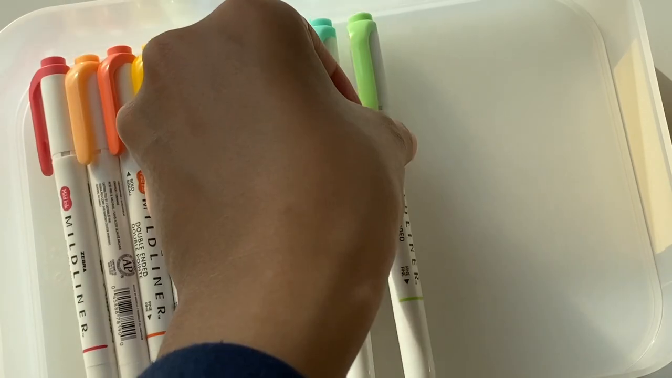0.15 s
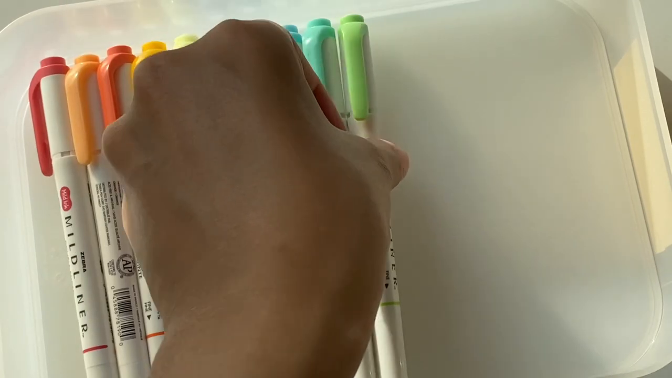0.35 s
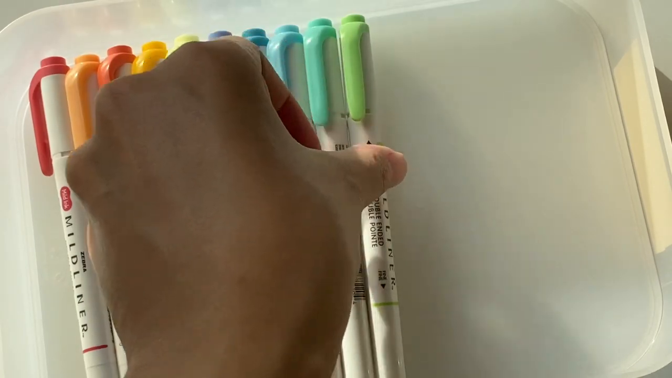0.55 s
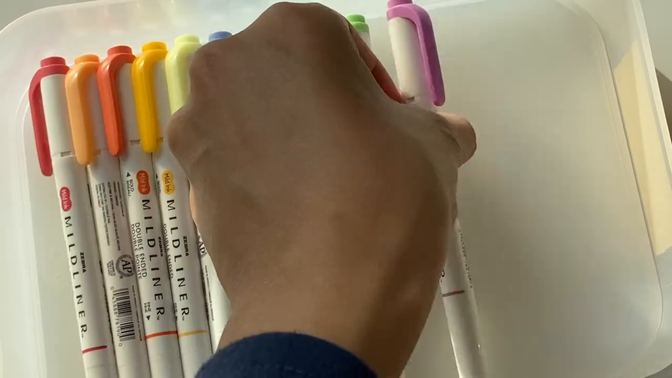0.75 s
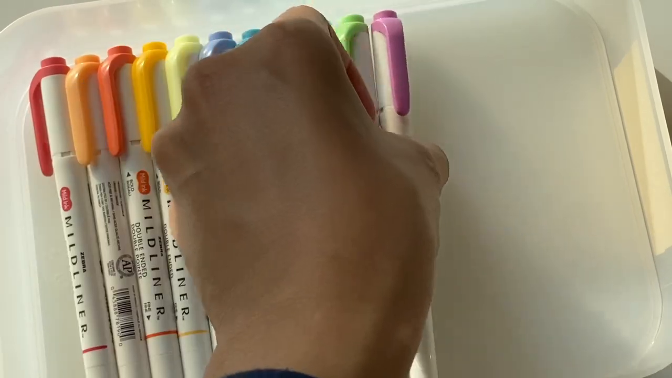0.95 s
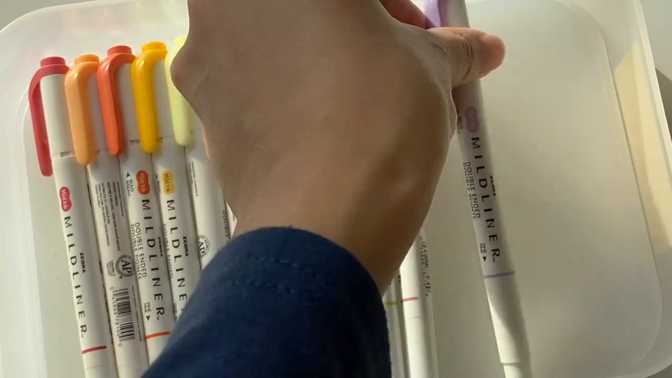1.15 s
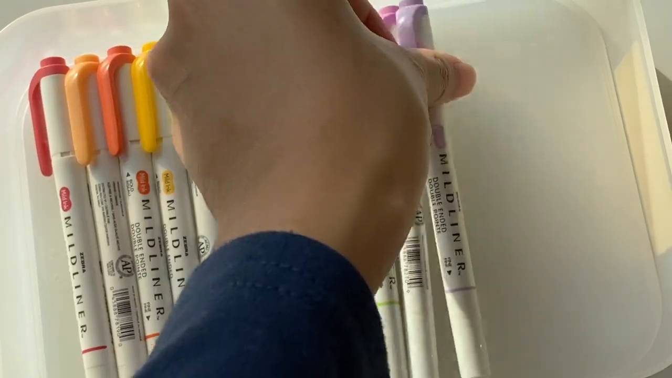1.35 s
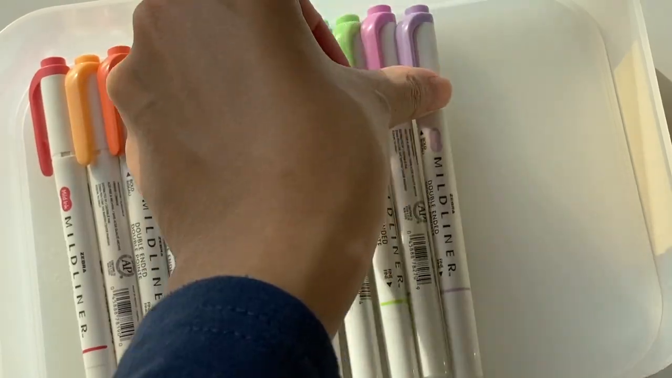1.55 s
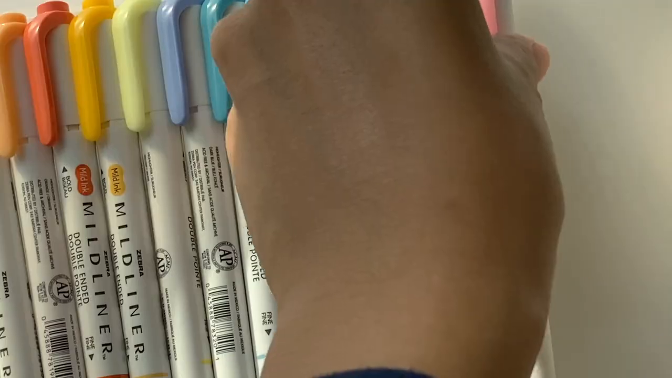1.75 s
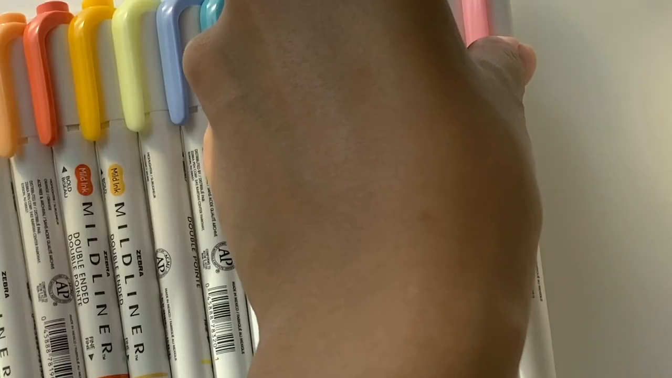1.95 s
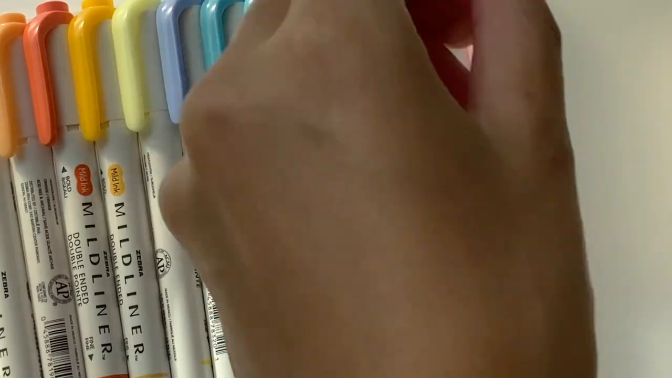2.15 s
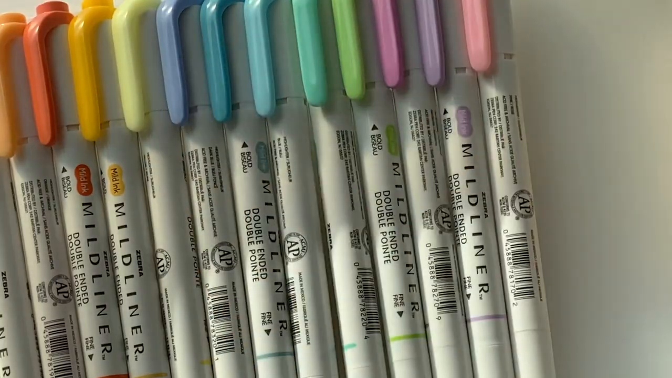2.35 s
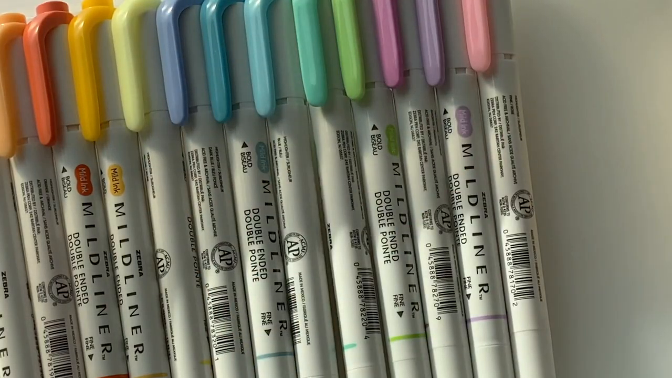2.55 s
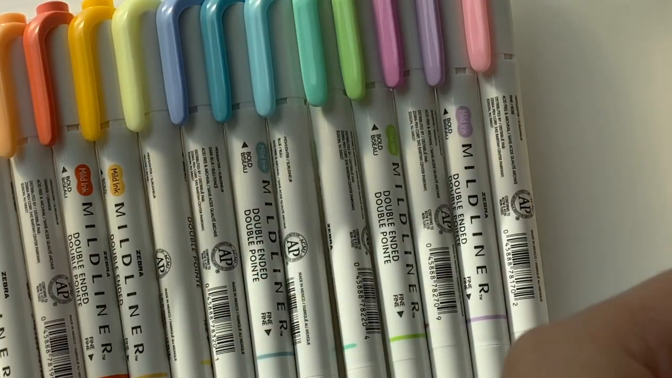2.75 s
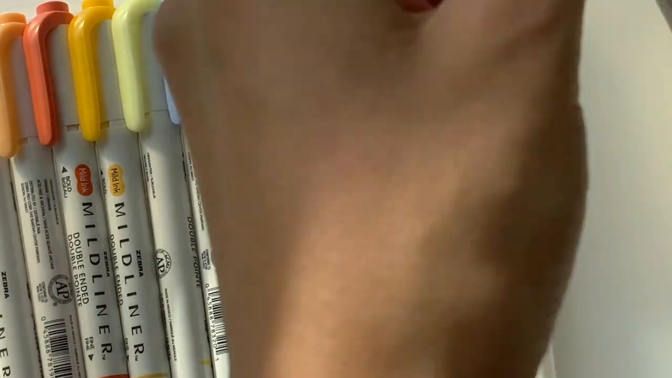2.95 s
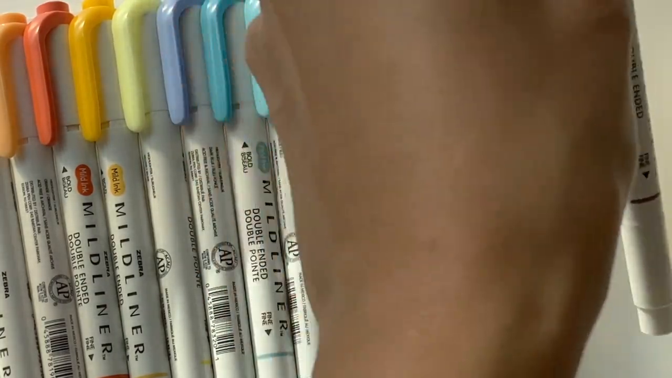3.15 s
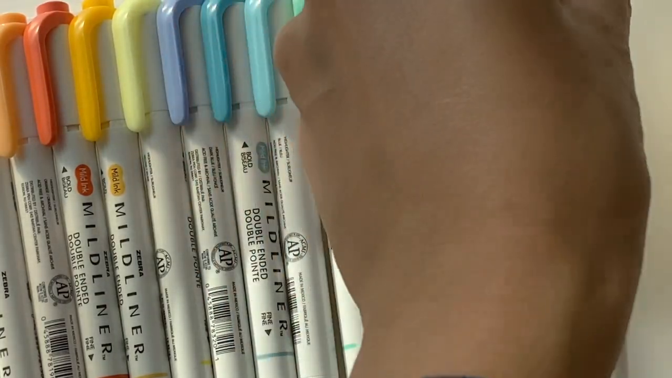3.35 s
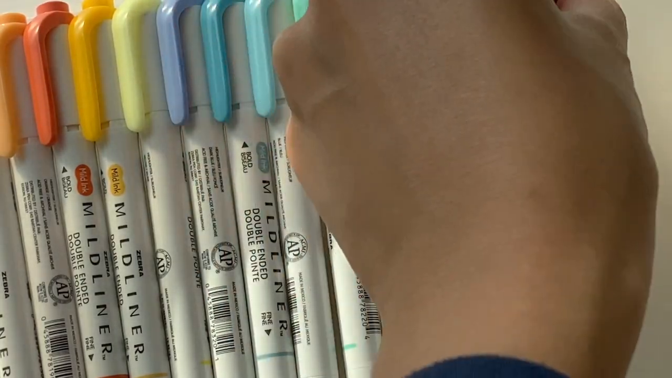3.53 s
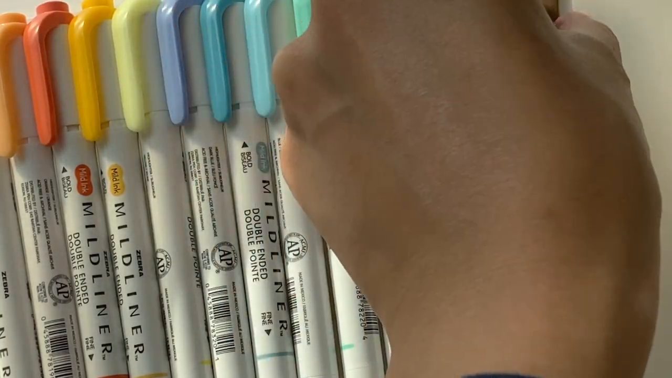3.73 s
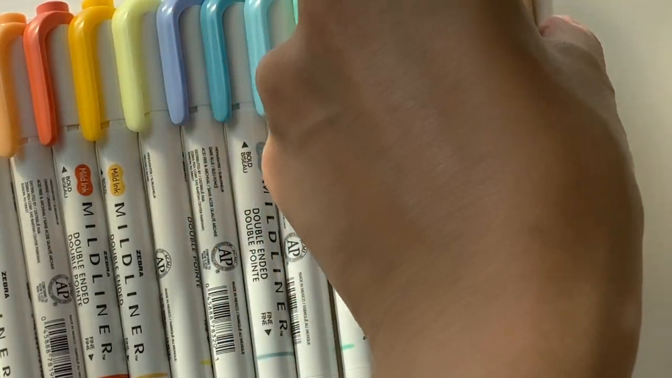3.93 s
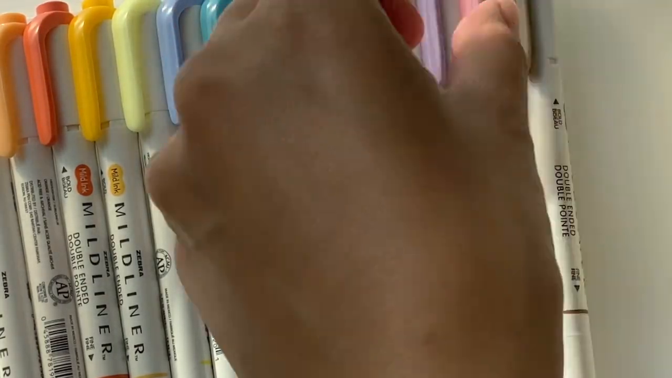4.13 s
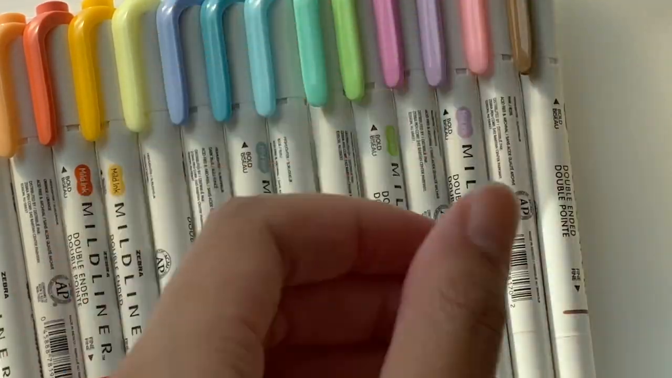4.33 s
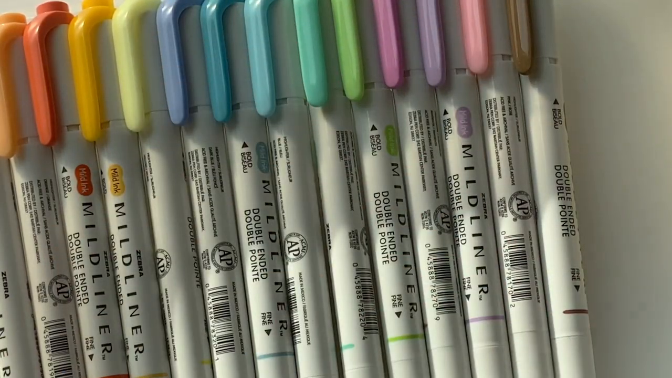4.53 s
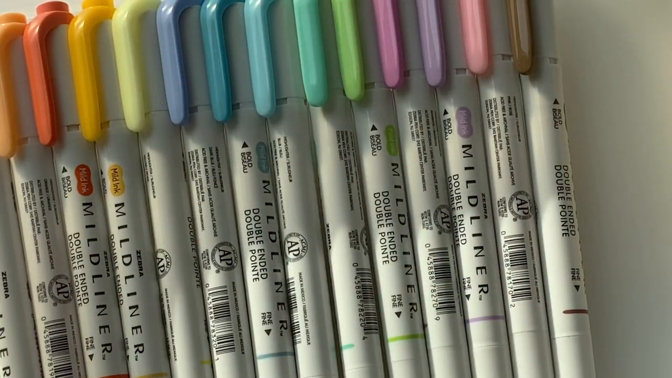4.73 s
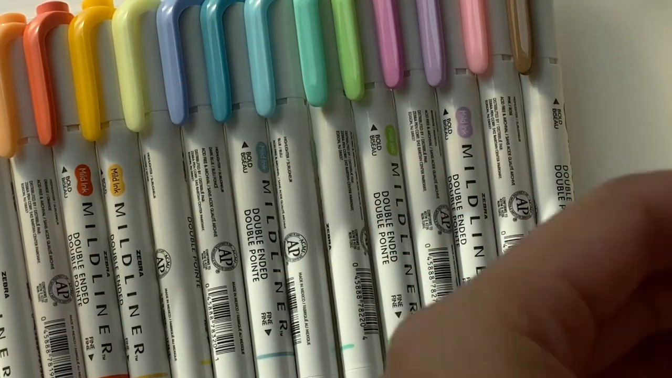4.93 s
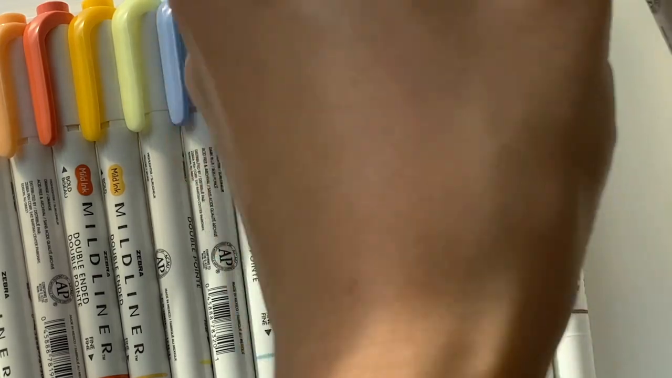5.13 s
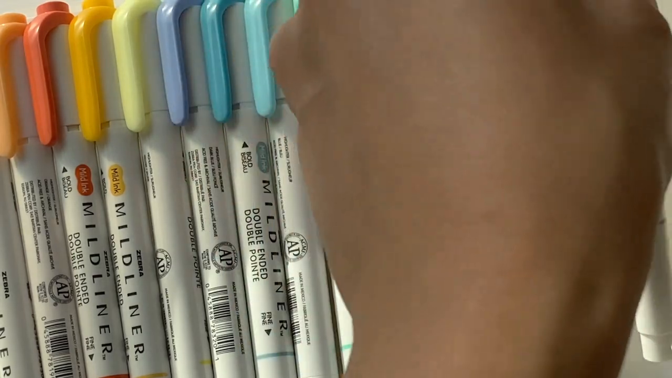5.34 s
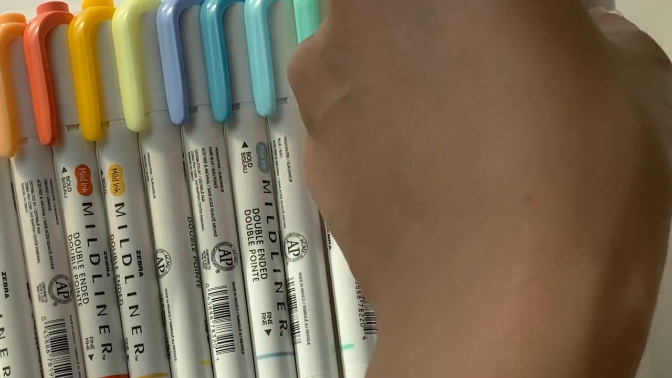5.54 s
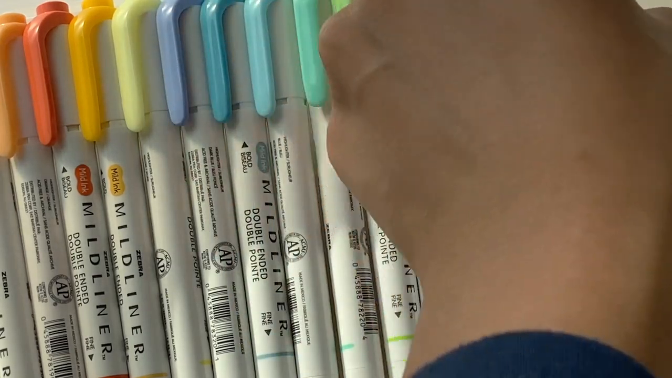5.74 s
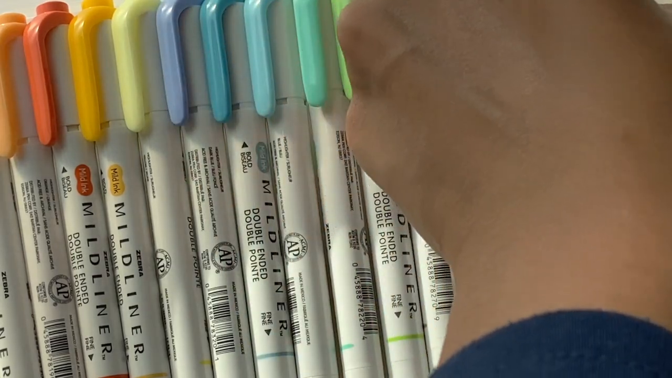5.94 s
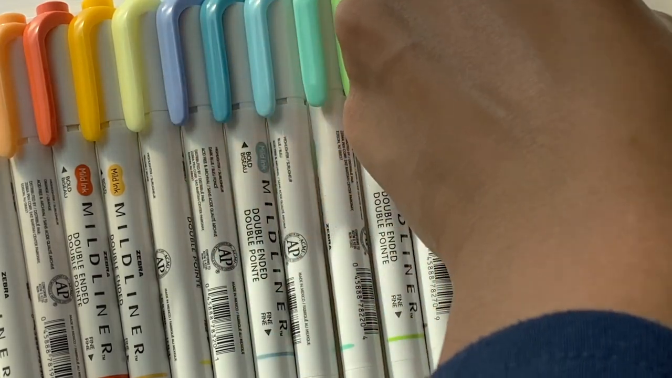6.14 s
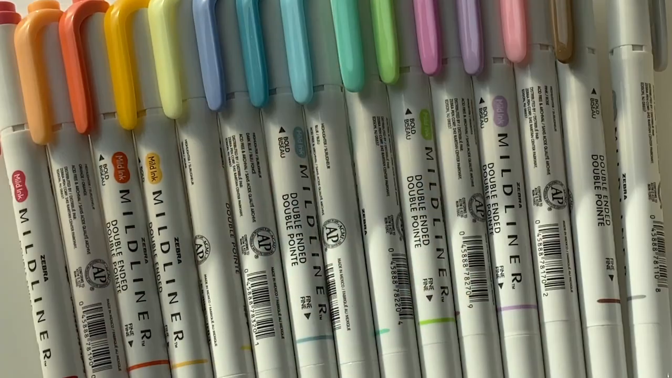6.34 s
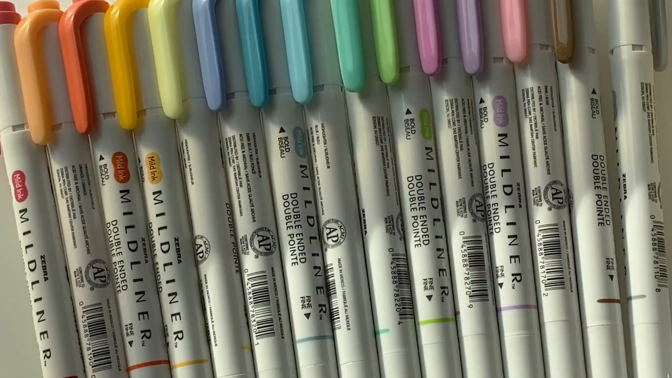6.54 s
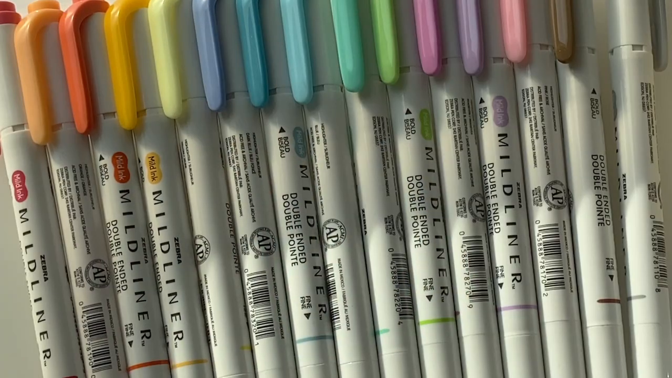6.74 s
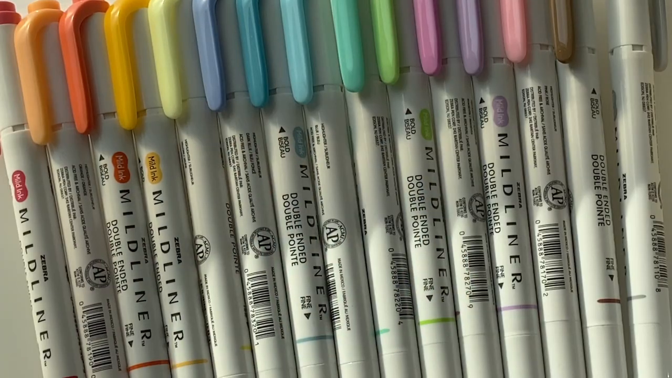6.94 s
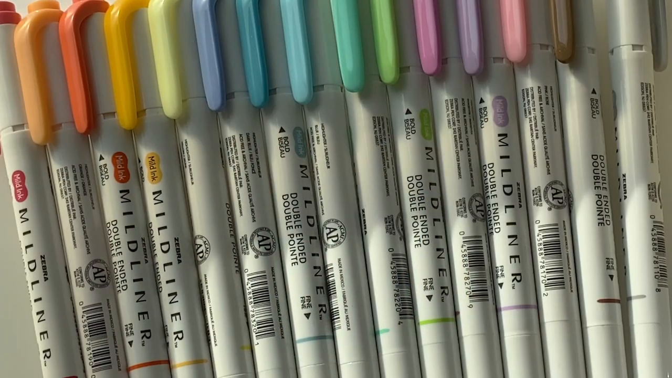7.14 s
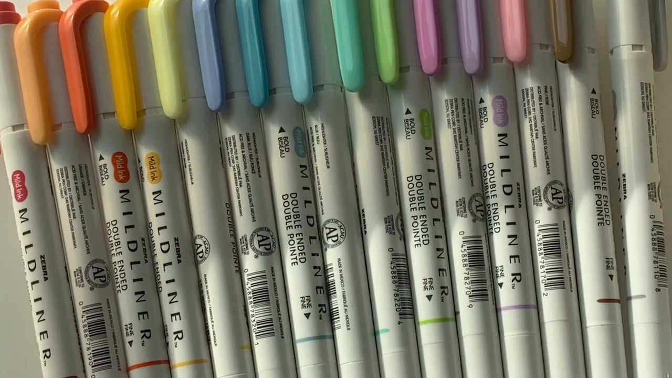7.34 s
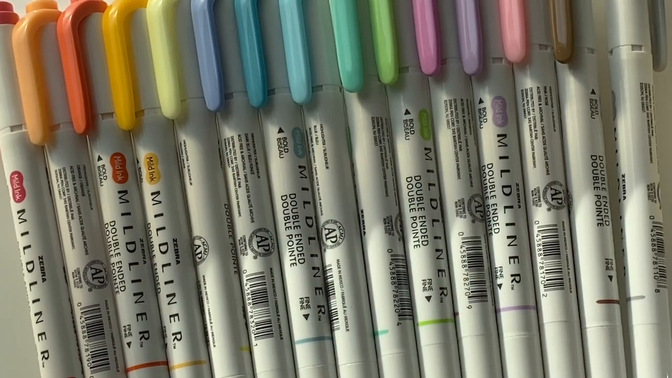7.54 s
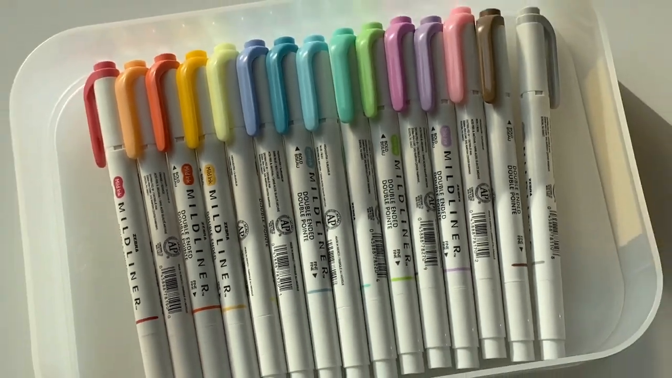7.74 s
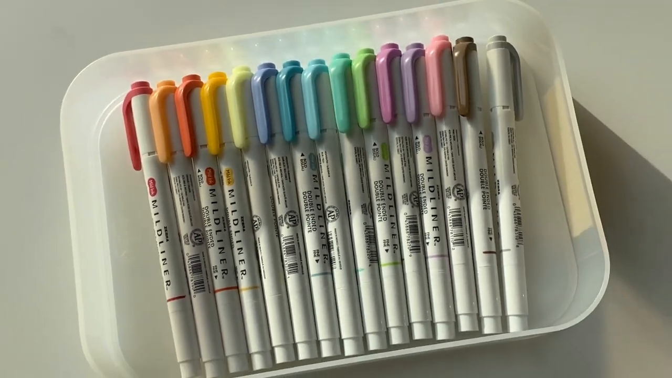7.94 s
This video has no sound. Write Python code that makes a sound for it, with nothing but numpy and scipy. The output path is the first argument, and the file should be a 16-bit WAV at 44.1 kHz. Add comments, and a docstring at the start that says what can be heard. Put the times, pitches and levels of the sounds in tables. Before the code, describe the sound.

Hollow plastic pens are laid one by one in a plastic tray, sharp clacks first, then sparse soft taps, in a small room.

```python
"""A faint scrape over a low room rumble, then the clack of a plastic pen landing in a thin plastic tray.
More pens are laid beside it, close to a two-port microphone in a small room; they slide and nudge neighbours.
Each blow is a click that rings the modes of the hollow pens and the tray floor, followed by nearby scatter
and room echoes. Slides are runs of tiny contacts through the same tray. A sleeve swishes now and then as
swells of bright noise, and shaped noise with a swelling low end makes the rumble."""
import sys
import numpy as np
from scipy import signal
from scipy.fft import rfft, irfft
from scipy.io import wavfile

SR = 44100
rng = np.random.default_rng(int(sys.argv[2]) if len(sys.argv) > 2 else 0)


def digitize_waveform(pressure):
    """Quantize a signal to 16-bit integers and store it at the path in sys.argv[1].

    Rows of a 2-D input are taken as channels; values are limited to [-1, 1].
    """
    field = np.atleast_2d(pressure).T
    bounded = np.clip(field, -1, 1)
    quanta = np.round(bounded * 32767).astype(np.int16)
    wavfile.write(sys.argv[1], SR, quanta)


N = 351918  # samples in the scene

# A pen is let go and lands, one end after the other; levels are relative:
# start_s, level_db, pitch_hz (strongest ring), tray_floor_db, hardness_db, other_end_wait_s
LANDINGS = [(0.1662, 1.5, 2350, -0.5, -1.5, .0038), (0.8021, 1, 1999, -0.5, 3.5, 0.0044),
            (1.445, -4.5, 2200, 1, 4.5, .0105), (1.6479, -14.5, 2290, 1.5, 1.5, 0.014),
            (3.4039, -15.5, 2984, 3.5, 9, .0274), (5.4181, -19.5, 1520, -1, 1, 0.012)]
# Single contacts with a neighbour or the tray: start_s, level_db (relative), pitch_hz, tray_floor_db, hardness_db
TAPS = [(0.196, -9.5, 2630, 2.5, 4.5), (0.2787, -30, 4700, 0, 15.5), (0.339, -34.5, 1900, 0.5, 8),
        (0.3765, -28.5, 2280, -2, 2), (0.9678, -21.5, 2000, -17, 8.5), (1.229, -30, 2280, 8.5, -12),
        (1.2905, -39, 1850, 4.5, -21), (1.3092, -31.5, 1880, 1, -6), (1.3512, -30.5, 5200, 8, 10.5),
        (1.3698, -13, 2180, -5.5, -4), (1.4105, -25, 2130, 4.5, 5), (1.432, -16, 6904, -1, 5.5),
        (1.4783, -11.5, 1670, -5.5, 3), (1.7452, -39, 6700, -2.5, 6.5), (2.3763, -47, 3353, -34, 12),
        (3.371, -27.5, 2100, 4, 3.5), (3.384, -32.5, 1420, 4.5, 1), (3.572, -41, 1773, -2, -19),
        (3.7082, -30.5, 740, 6.5, -18.5), (3.762, -41, 1464, 4, -13), (3.846, -40.5, 2340, 7, -2),
        (3.971, -35, 760, 5, -19), (5.561, -38, 1193, 0, 0.5), (5.7577, -43, 2045, -14, -21),
        (5.803, -59, 1240, -3, -17), (6.0833, -41.5, 1500, 2.5, -7), (6.1077, -32.5, 629, 10, -15),
        (6.188, -38, 2300, -0.5, -3), (6.2022, -9, 2300, -3, -4.5), (7.5017, -50, 753.3, 8.5, -8.5),
        (7.61, -60, 2112, 1, -0.5)]
# Pens sliding or rocking to rest on the tray or each other:
# start_s, end_s, grain_level_db (relative), pitch_hz, hardness_db
SLIDES = [(.072, .163, -61.5, 1380, -15), (.35, .385, -54.5, 2180, 6.5), (.777, .801, -54.5, 1810, -7),
          (1.2215, 1.25, -48, 2000, 1), (1.27, 1.34, -56.5, 2000, -2), (1.342, 1.44, -51.5, 1900, -8),
          (2.37, 2.42, -79, 3500, 13), (3.5, 3.64, -66, 1300, -5), (3.76, 3.87, -70, 1000, -13.5),
          (5.47, 5.61, -67, 2900, 2)]
# Spectrum of a typical blow: freq_hz, level_db (relative)
BLOW_SPECTRUM = [(40, 7), (115, 24), (190, 23.5), (290, 29.5), (600, 29), (1000, 25.5), (2000, 19),
                 (3200, 15), (6000, 14), (8500, 7.5), (13000, 3.5), (15500, -12.5)]
# Tray modes: pitch_hz, level_db (over the contact click, before each blow's random share), t60_s
TRAY_MODES = [(116, 7, 0.2), (281.6, 11, .45), (357.2, 8, 0.048), (424.3, 8, 0.25), (512, 6.5, 0.16),
              (601, 11.5, 0.11), (672.4, 9, 0.13), (878, 9, 0.074), (1028.7, 7, 0.26), (1191, 5.5, 0.32),
              (1277, 7.5, .14), (1456, 10.5, .15), (1744, 12, 0.15), (1908, 7.5, 0.062), (2340, 8.5, 0.27),
              (2640, 8, .13), (2880, 8, 0.14)]
# Modes of a hollow pen barrel with its cap: pitch_hz, level_db (as for the tray), t60_s
PEN_MODES = [(1360, 8.5, 0.0087), (1930, 7.5, 0.0031), (2330, 7.5, .016), (2670, 1, 0.015),
             (3000, 4.5, 0.0092), (3320, 3, .15), (3944, 2, 0.031), (4540, -0.5, 0.026), (5130, 4, 0.013),
             (6170, 4, 0.0066)]
# The tray floor carries the bass: freq_hz, share_of_tray_floor_db (ratio)
FLOOR_REACH = [(230, 1.0), (650, 0.72), (1300, -0.01), (2400, 0)]
# A hard, short contact reaches the treble, a cushioned one does not: freq_hz, share_of_hardness_db (ratio)
HARD_REACH = [(2400, 0), (4600, 1.0), (10000, 1.17)]
# The plastic gives a little at every contact and rounds off the very top: freq_hz, gain_db
PLASTIC_GIVE = [(4600, 0), (10000, -3.5)]
# What the room gives back of a blow: freq_hz, gain_db
ROOM_GAIN = [(120, 3.5), (300, -2.5), (700, -3.5), (1400, -5), (2400, 1.5), (5000, 1), (12000, -16.5)]
# Decay of the room: freq_hz, t60_s
ROOM_T60 = [(120, .45), (400, 0.38), (1500, 0.47), (5000, 0.19), (12000, 0.49)]
# Left-right likeness of the echoes: freq_hz, likeness (1 = identical)
ROOM_LIKENESS = [(100, 0.97), (350, 0.88), (700, .3), (1100, 0.13), (1800, 0.91), (6500, 0.926),
                 (9000, 0.98), (15000, 0.56)]
# Sleeve swishes: centre_s, half_length_s, level_db (rms at the peak of a swell)
SWISHES = [(2.14, 0.09, -71), (2.392, 0.045, -64), (2.601, 0.05, -64), (4.793, 0.043, -65),
           (4.971, 0.051, -80.5)]
# Spectrum of rubbing cloth: freq_hz, level_db (relative)
CLOTH_SPECTRUM = [(500, -30), (2500, -9), (5000, -5), (8000, -7), (11000, 0), (15500, -3)]
# Spectrum of the background: freq_hz, density_db (per Hz, relative)
RUMBLE_SPECTRUM = [(15, -43.5), (25, -14), (44, -3.5), (65, 3), (91, -5.5), (192, -9.5), (286, -25.5),
                   (309, -26), (372, -25), (684, -30.5), (1360, -41.5), (6670, -49), (8930, -53),
                   (11000, -52.5), (14000, -69.5)]
# Left-right likeness of the background: freq_hz, likeness (1 = identical)
RUMBLE_LIKENESS = [(50, 1), (200, 0.72), (800, 0.39), (2000, 0.41), (5000, 1)]
# Slow contour of the low rumble, followed only in part and around its median: time_s, level_db
RUMBLE_CONTOUR = [(0.0, -47.5), (1.6, -45.5), (2.02, -52), (3.33, -56.5), (3.58, -50), (4.93, -60),
                  (5.58, -47.5), (6.4, -57.5), (7.98, -51)]
# In the top octave one microphone port lags the other: freq_hz, lag_cycles
PORT_LAG = [(7400, 0), (9100, .5), (10700, 1), (11600, 1), (13300, 1.5), (15000, 2)]

# The less a blow goes into the tray floor, the more its one resonance stands out: dB, dB lost per dB of floor
RING_DB, RING_DAMPING = 7.5, 0.25
# The other end of a pen lands weaker and rings lower: dB, pitch ratio
OTHER_END_DB, OTHER_END_PITCH = -5, 0.68
# Just ahead of a landing the pen grazes the tray floor, weak and bassy
GRAZE_AHEAD_S, GRAZE_DB, GRAZE_FLOOR_DB = 0.0023, -19, 9
CUT_S = 6.283  # pens still ringing here stop abruptly
RUMBLE_DB = -49  # background rms before its low end swells
BAND_EDGE_HZ = 16000
LEAD = 64  # samples of quiet ahead of each knock
SIZE = 24576  # samples in one knock
HZ, T = np.fft.rfftfreq(SIZE, 1 / SR), np.arange(SIZE) / SR  # axes of one knock
ALL_HZ = np.fft.rfftfreq(N, 1 / SR)  # frequency axis of the whole scene


def pens(slide_floor_db=2.0, slide_ring_db=3.5):
    """Plays the blows, and the slides as runs of tiny contacts on the same tray."""
    out = np.zeros((2, N))
    modes = resonances(TRAY_MODES + PEN_MODES)
    spaces = [surroundings() for _ in range(7)]
    for k, (start_s, level_db, pitch_hz, floor_db, hard_db) in enumerate(contacts()):
        ring_db = RING_DB - RING_DAMPING * floor_db
        blow = knock(pitch_hz, ring_db, floor_db, hard_db, modes, spaces[k % len(spaces)])
        add(out, start_s - LEAD / SR, amp(level_db) * blow)
    for k, (start_s, end_s, level_db, pitch_hz, hard_db) in enumerate(SLIDES):
        grain = knock(pitch_hz, slide_ring_db, slide_floor_db, hard_db, modes, spaces[k % len(spaces)])
        slide = signal.fftconvolve(catches(end_s - start_s)[None], grain, axes=1)
        add(out, start_s - LEAD / SR, amp(level_db) * slide)
    # the pens lie slightly to the left
    return out * amp([[0.4], [-0.4]])


def contacts():
    """Lists the graze and both ends of each landing pen, then the single taps, in the columns of TAPS."""
    rows = []
    for start_s, level_db, pitch_hz, floor_db, hard_db, wait_s in LANDINGS:
        graze_s = start_s - GRAZE_AHEAD_S
        rows.append((graze_s, level_db + GRAZE_DB, pitch_hz, floor_db + GRAZE_FLOOR_DB, hard_db))
        rows.append((start_s, level_db, pitch_hz, floor_db, hard_db))
        other_pitch_hz = pitch_hz * OTHER_END_PITCH
        rows.append((start_s + wait_s, level_db + OTHER_END_DB, other_pitch_hz, floor_db, hard_db))
    return rows + list(TAPS)


def knock(pitch_hz, ring_db, floor_db, hard_db, modes, space, ring_width=0.12):
    """One contact: a click plus pen and tray modes, coloured by how hard and where it lands."""
    near, room = space
    force_db = read(BLOW_SPECTRUM, HZ) + read(PLASTIC_GIVE, HZ)
    force_db = force_db + floor_db * read(FLOOR_REACH, HZ) + hard_db * read(HARD_REACH, HZ)
    force = causal(force_db)
    # the spot that is struck favours one broad resonance and gives each mode its own share
    half_favour = causal(0.5 * ring_db / (1 + ((HZ / pitch_hz - 1) / ring_width) ** 2))
    shares = amp(3 * rng.standard_normal(len(modes)) - 1.5)
    ringing = 1 + (shares[:, None] * modes).sum(0)
    # the room gathers sound from all sides of the tray, which evens out the peaks
    heard = half_favour * ringing * near + room
    sound = irfft(force * bending() * half_favour * heard)
    fade_out = np.minimum(1, 10 * (T[-1] - T))
    return amp(-4.5) * np.roll(sound, LEAD, axis=1) * fade_out


def resonances(modes):
    """Frequency response of each damped mode, one row a mode; a shorter t60 gives a wider peak."""
    hz, db, t60 = np.transpose(modes)[:, :, None]
    half_width = np.log(1000) / (2 * np.pi * t60)
    return amp(db) * 2j * half_width * HZ / (hz ** 2 - HZ ** 2 + 2j * half_width * HZ)


def bending(bass_delay_s=0.0079, knee_hz=420):
    """Bending waves cross the tray floor slowly in the bass, by a path that differs with each blow."""
    path = rng.uniform(0.43, 0.82)
    delay = bass_delay_s * path / (1 + (HZ / knee_hz) ** 2)
    # summing the delay over frequency gives the phase
    return np.exp(-2j * np.pi * np.cumsum(delay) * SR / SIZE)


def catches(length_s, grains_per_s=2500, stick_db=5, grip_band_hz=110):
    """Tiny contacts of a sliding pen, bunched by stick and slip."""
    grip = unit(irfft(rfft(rng.standard_normal(SIZE)) * (HZ < grip_band_hz)))
    sizes = rng.standard_normal(SIZE) * amp(stick_db * grip)
    struck = rng.random(SIZE) < grains_per_s / SR
    return sizes * struck * (T < length_s)


def surroundings(direct_db=-2, chatter_db=-5, scatter_db=-5, wall_db=-15, wall_s=0.0105):
    """The near field (direct sound, contact chatter, scatter among the pens, one reflection) and the room."""
    chatter = tail([(300, 0.03), (9000, 0.018)], rise_s=0.0003)  # freq_hz, t60_s
    scatter = tail([(250, 0.13), (1500, 0.082), (9000, 0.054)], rise_s=0.0007)
    wall = np.exp(-2j * np.pi * HZ * wall_s)
    near = amp(direct_db) + amp(chatter_db) * chatter + amp(scatter_db) * scatter + amp(wall_db) * wall
    return near, amp(read(ROOM_GAIN, HZ)) * tail(ROOM_T60, rise_s=0.014)


def tail(t60s, rise_s):
    """Dense echoes of about unit energy, each band dying at its own speed; spectra for both ports."""
    hz, t, z = signal.stft(rng.standard_normal((2, SIZE)), SR, nperseg=256)
    decay = np.exp(-np.log(1000) * t / read(t60s, hz)[:, None])
    echoes = signal.istft(z * decay, SR, nperseg=256)[1][:, :SIZE]
    echoes = echoes * (1 - np.exp(-(T / rise_s) ** 2))
    return pair(rfft(echoes / np.linalg.norm(echoes[0])), read(ROOM_LIKENESS, HZ))


def add(mix, start_s, sound):
    """Mixes a sound in; whatever started before the cut and still rings there stops dead."""
    stop = round(CUT_S * SR) if start_s < CUT_S else N
    part = mix[:, round(start_s * SR):stop][:, :sound.shape[1]]
    part += sound[:, :part.shape[1]]


def sleeve():
    """Soft, bright swells of cloth noise as the arm moves."""
    t = np.arange(N) / SR
    speed = sum(amp(db) * np.exp(-((t - centre_s) / half_s) ** 2) for centre_s, half_s, db in SWISHES)
    return speed * noise(CLOTH_SPECTRUM, 1.0)


def rumble(follow=0.48, corner_hz=220):
    """The background of the room, as shaped noise; its low end slowly swells and sinks."""
    time_s, db = np.transpose(RUMBLE_CONTOUR)
    swell_db = follow * np.interp(np.arange(N) / SR, time_s, db - np.median(db))
    air = noise(RUMBLE_SPECTRUM, read(RUMBLE_LIKENESS, ALL_HZ))
    low = irfft(rfft(air) / (1 + (ALL_HZ / corner_hz) ** 4), N)
    return amp(RUMBLE_DB) * (air + low * (amp(swell_db) - 1))


def noise(spectrum, likeness):
    """Stereo noise of rms 1 with the given spectrum and left-right likeness."""
    z = rfft(rng.standard_normal((2, N))) * amp(read(spectrum, ALL_HZ))
    return unit(irfft(pair(z, likeness), N))


def pair(z, likeness):
    """Blends two unrelated spectra into a left and a right of the given likeness."""
    likeness = np.clip(likeness, -1, 1)
    mid = z[0] * np.sqrt((1 + likeness) / 2)
    side = z[1] * np.sqrt((1 - likeness) / 2)
    return np.array([mid + side, mid - side])


def causal(db):
    """Minimum-phase response with the given gain, so that nothing sounds before the blow."""
    log_gain = np.log(amp(np.concatenate([db, db[-2:0:-1]])))
    return np.exp(np.conj(signal.hilbert(log_gain)))[:len(db)]


def read(points, hz):
    """Joins (freq_hz, value) points on a log-frequency axis."""
    f, value = np.transpose(points)
    return np.interp(np.log(hz + 1), np.log(f + 1), value)


def unit(x):
    """Scales to rms 1."""
    return x / np.sqrt(np.mean(x ** 2) + 1e-20)


def amp(db):
    """Decibels to gain."""
    return 10 ** (np.asarray(db) / 20)


def scene():
    """Pens, sleeve and room together."""
    return pens() + sleeve() + rumble()


def record(dry):
    """The two ports resonate and part in phase at the top, peaks beyond full scale clip, and the band ends."""
    half_lag = np.exp(1j * np.pi * np.interp(ALL_HZ, *np.transpose(PORT_LAG)))
    port_peak = amp(8 * np.exp(-((ALL_HZ - 15200) / 1000) ** 2))  # 8 dB around 15.2 kHz
    ports = irfft(rfft(dry) * port_peak * np.array([1 / half_lag, half_lag]), N)
    clipped = np.clip(ports, -1, 1)
    lowpass = signal.firwin(511, BAND_EDGE_HZ, window=("kaiser", 9), fs=SR)
    return signal.oaconvolve(clipped, lowpass[None], "same")


dry = scene()
out = record(dry)
digitize_waveform(out)
```